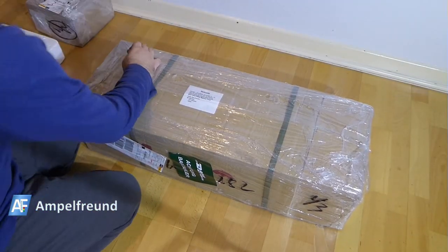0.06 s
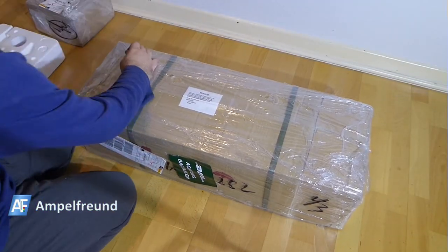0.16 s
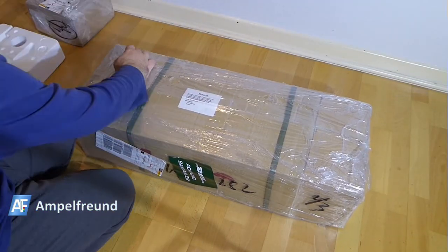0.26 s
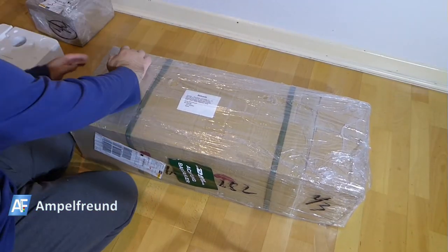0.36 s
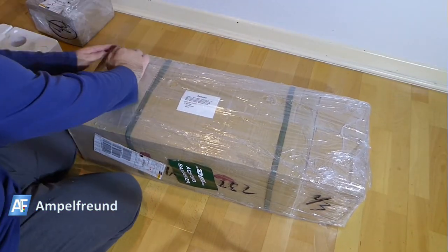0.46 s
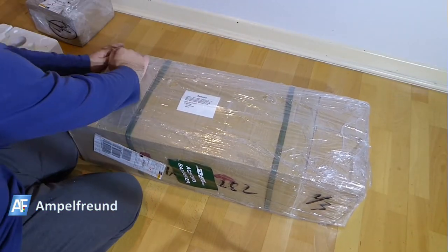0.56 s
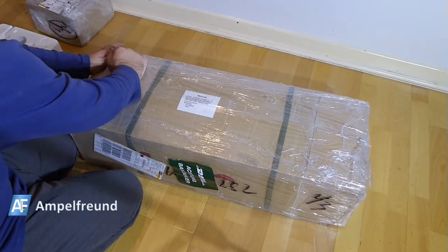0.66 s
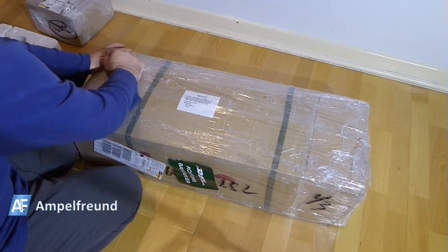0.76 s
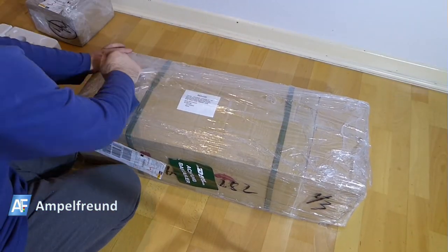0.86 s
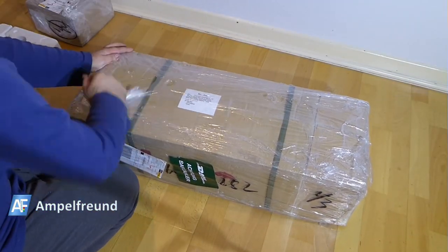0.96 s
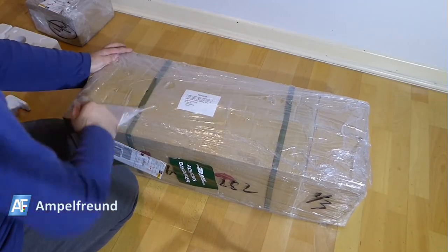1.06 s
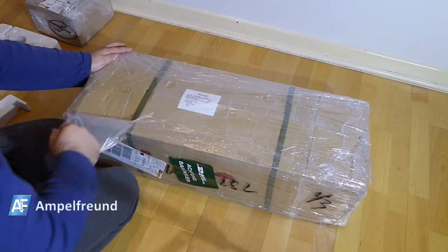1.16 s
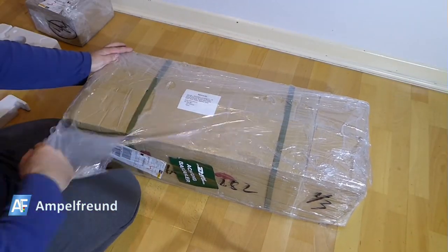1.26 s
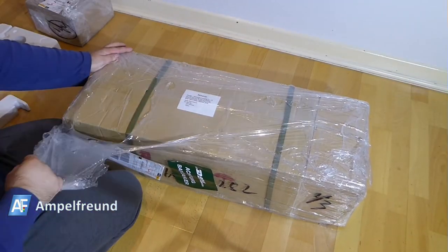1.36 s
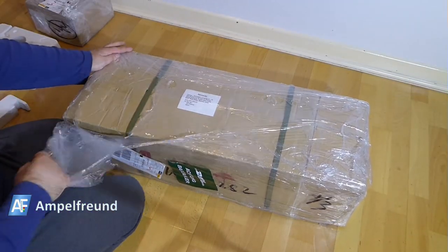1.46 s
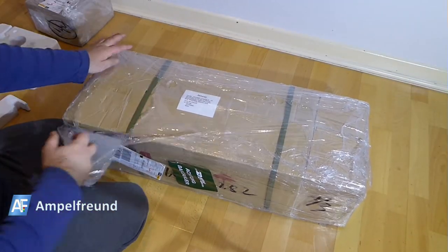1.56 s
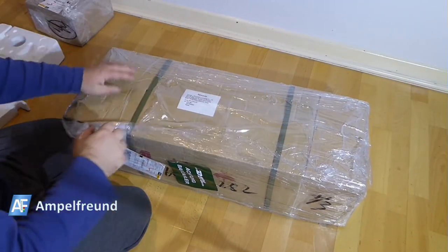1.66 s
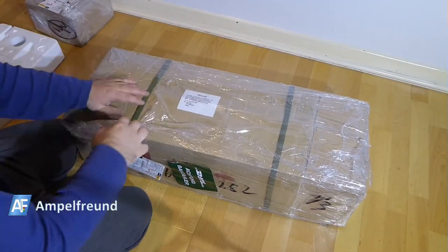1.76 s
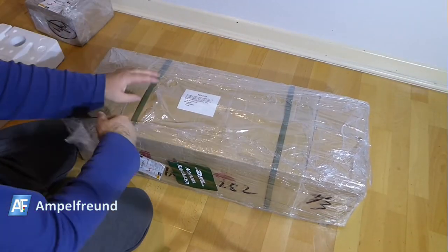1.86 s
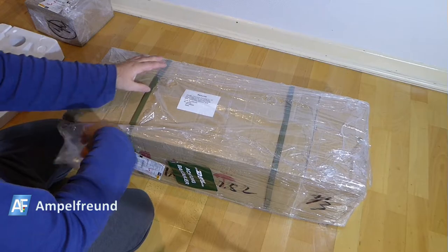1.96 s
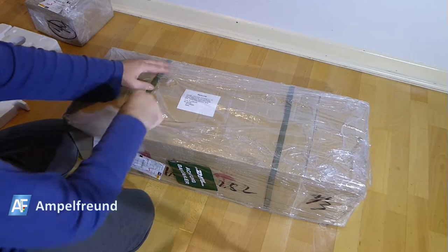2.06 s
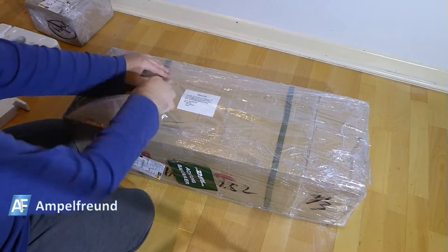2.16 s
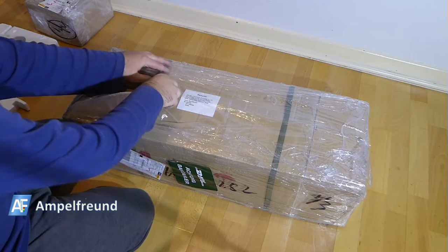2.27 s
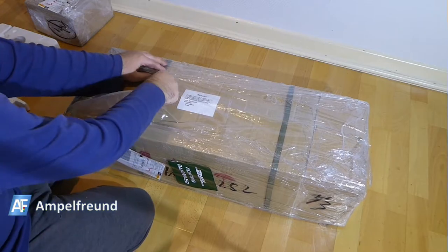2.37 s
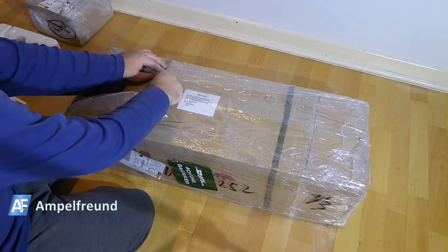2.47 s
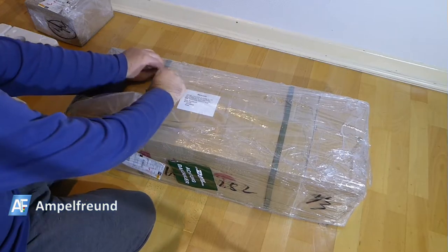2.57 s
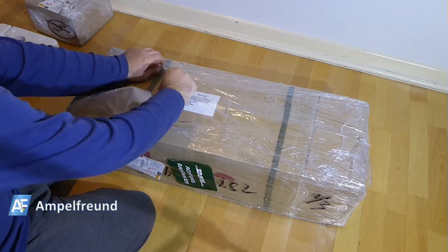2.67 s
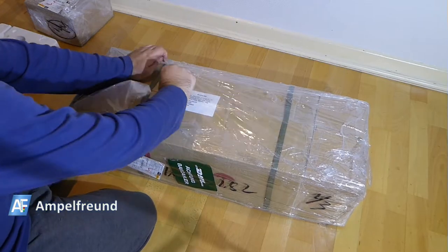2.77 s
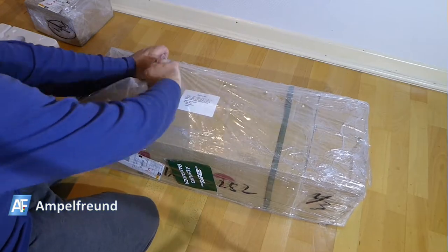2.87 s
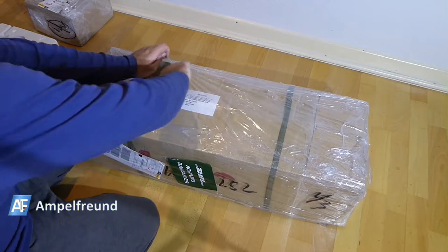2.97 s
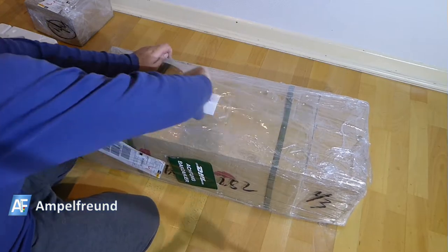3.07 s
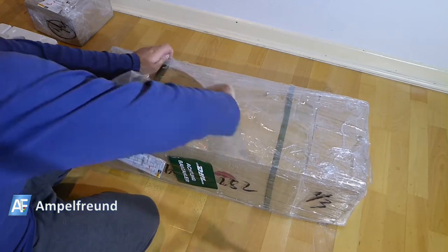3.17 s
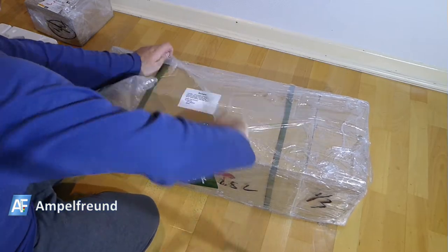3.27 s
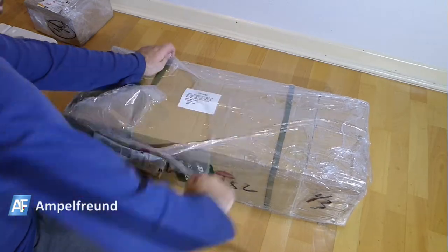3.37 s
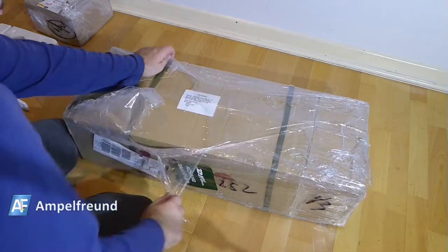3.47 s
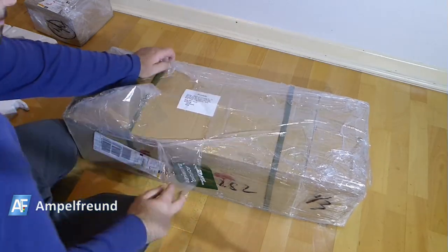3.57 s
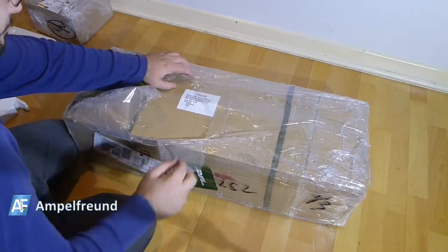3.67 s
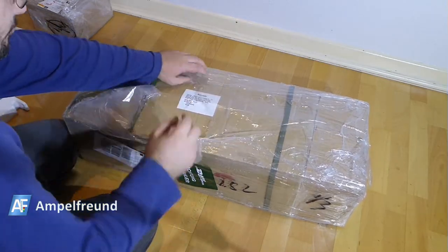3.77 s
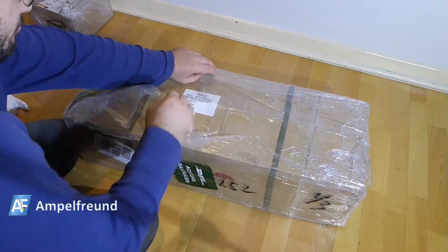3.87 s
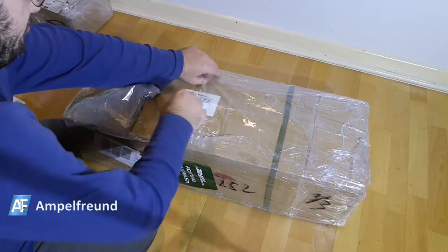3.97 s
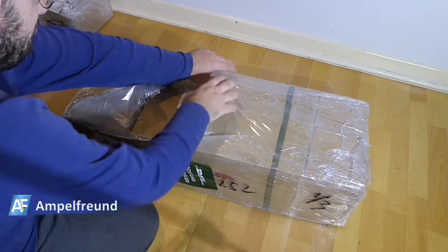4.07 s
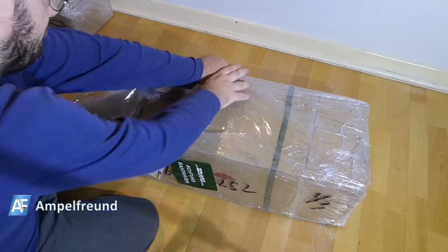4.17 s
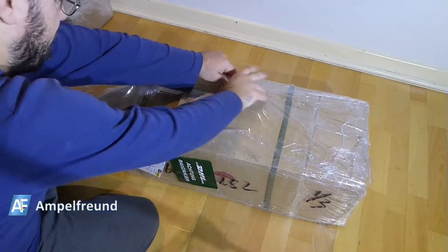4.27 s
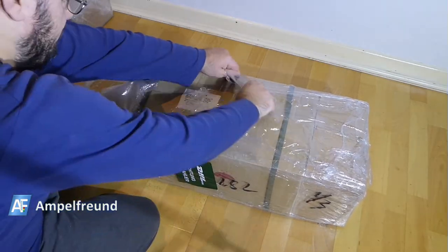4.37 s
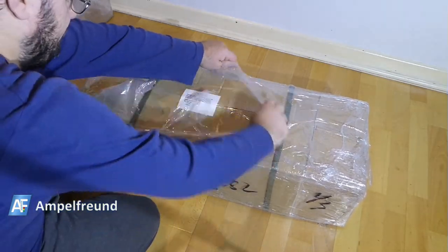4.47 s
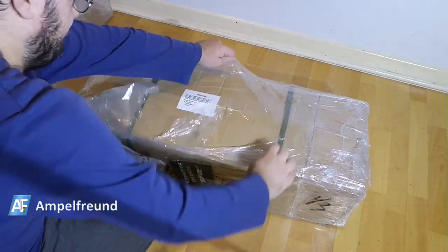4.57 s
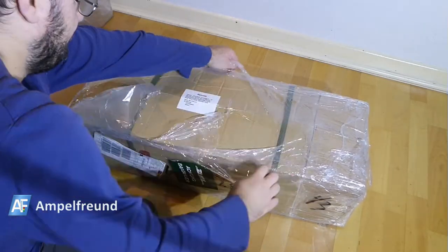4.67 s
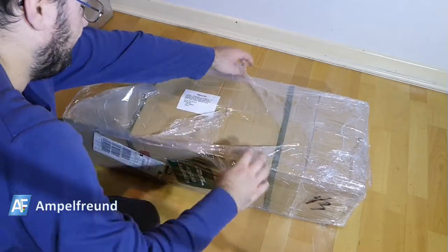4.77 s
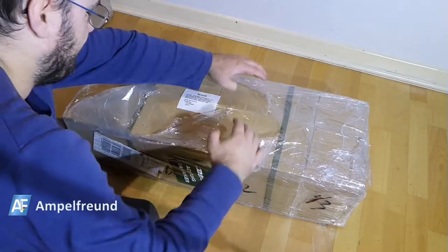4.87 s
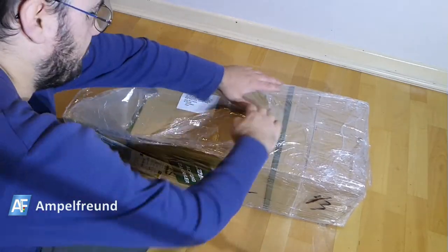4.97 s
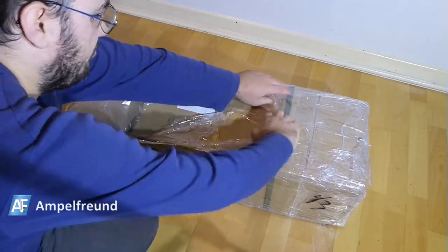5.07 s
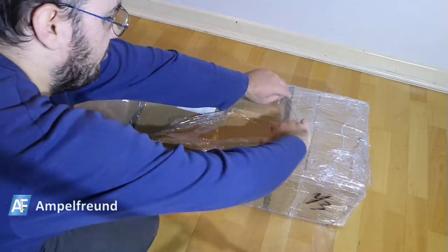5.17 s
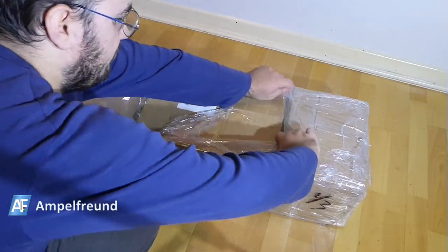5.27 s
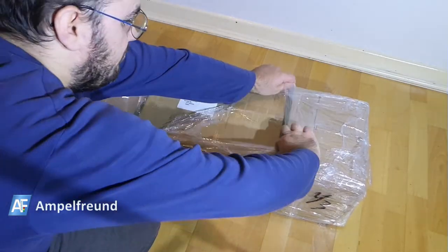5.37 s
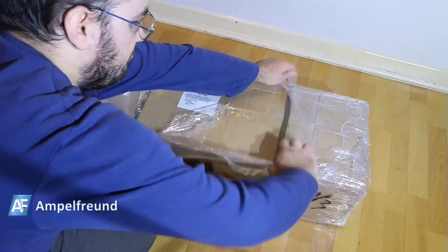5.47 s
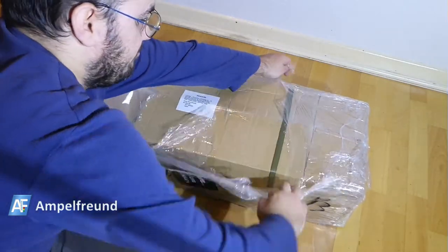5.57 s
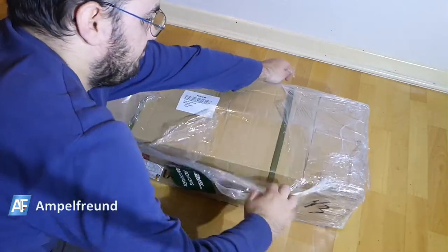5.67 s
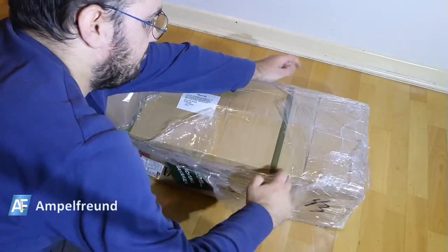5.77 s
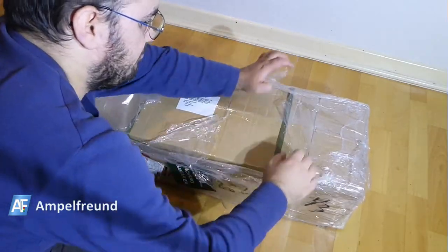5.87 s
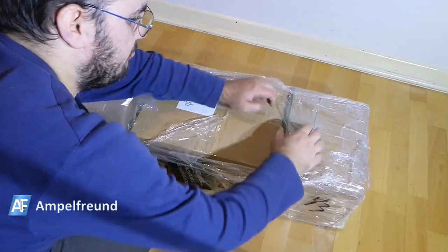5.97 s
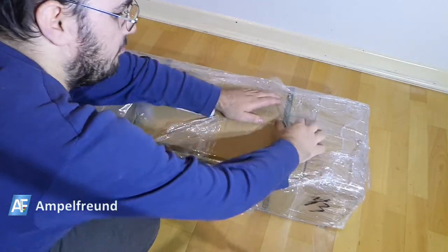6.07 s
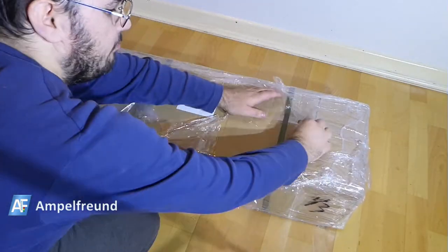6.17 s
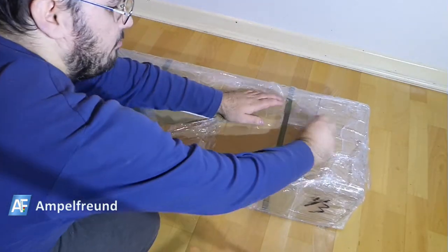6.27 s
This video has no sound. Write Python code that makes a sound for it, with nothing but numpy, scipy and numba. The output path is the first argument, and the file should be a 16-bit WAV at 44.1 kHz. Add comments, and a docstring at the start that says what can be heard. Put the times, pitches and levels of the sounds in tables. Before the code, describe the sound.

Thin plastic film is torn and pulled off a hollow cardboard box, crackling brightly in uneven bursts with sharp snaps and soft knocks, close in a small room.

```python
"""A dense crackle opens at once: thin plastic stretch film is torn and pulled off a cardboard box.
Thousands of creases buckle as tiny swelling and dying sines, over a rumble of film and fingers dragging
on the hollow box. Taut strands snap in short volleys of clicks; hands knock, waking the box modes.
Decaying noise gives a small bare room that smears it all, over a quiet bed of filtered noise."""
import sys
import numpy as np
from scipy import signal
from scipy.fft import rfft, irfft
from scipy.io import wavfile
from scipy.ndimage import uniform_filter1d
from numba import njit

SR = 44100
rng = np.random.default_rng(int(sys.argv[2]) if len(sys.argv) > 2 else 0)


def store_pcm(level_fs):
    """Save levels as 16-bit WAV."""
    pcm = np.round(np.clip(level_fs, -1, 1) * 32767).astype(np.int16)
    wavfile.write(sys.argv[1], SR, np.atleast_2d(pcm).T)


def voltage_ratio(decibels):
    """Convert decibels (scalar or array-like) to amplitude ratios, 20 dB per decade."""
    exponent = np.asarray(decibels, float) / 20
    return 10 ** exponent


N = 279153  # samples, 6.33 s
MIDDLING_DB = -40  # a middling pull, on the scale of PULL


def read(table, column, at):
    """A column of a curve at the given moments, with straight lines between its points."""
    return np.interp(at, np.array(table)[:, 0], np.array(table)[:, column])


def shape(x, points):
    """Filter by (Hz, dB) points, joined over log frequency."""
    hz, db = np.transpose(points)
    f = np.arange(N // 2 + 1) * SR / N + 1
    gain_db = np.interp(np.log(f), np.log(hz), db)
    return irfft(rfft(x) * voltage_ratio(gain_db), N)


def walk(rate):
    """Random levels held 1 / rate s and slewed; spread near 1."""
    hold = int(SR / rate)
    levels = rng.standard_normal(N // hold + 1)
    return uniform_filter1d(np.repeat(levels, hold), hold // 2)[:N]


@njit
def ring(at, lag, hz, t60, rise, left, right, n, sr):
    """Each click is a sine that swells and dies, run until 50 dB down; the right ear is lag samples late."""
    out = np.zeros((2, n + 16))  # 8 spare samples at each end for the lag
    for k in range(len(at)):
        turn = np.exp(2j * np.pi * hz[k] / sr - np.log(1000) / (t60[k] * sr))
        soften = np.exp(-hz[k] / (rise * sr))
        z, soft = 1 + 0j, 1.
        start = int(at[k] * sr)
        for i in range(start, min(n, start + int(t60[k] * sr * 5 / 6) + 2)):
            z *= turn
            soft *= soften
            out[0, i + 8] += left[k] * z.imag * (1 - soft)
            out[1, i + 8 + lag[k]] += right[k] * z.imag * (1 - soft)
    return out[:, 8:n + 8]


def clicks(at, hz, t60, db, sign, pan_db, rise_cycles, lag_spread):
    """Place clicks by level and arrival: spread over the box, they reach the two ears a few samples apart."""
    size = voltage_ratio(db) * np.sign(sign)
    left, right = size * voltage_ratio(pan_db / 2), size * voltage_ratio(-pan_db / 2)
    hz = np.clip(hz, 60, 15300)
    lag = np.round(lag_spread * rng.standard_normal(len(at)))
    lag = np.clip(lag, -8, 8).astype(int)  # negative: the right ear hears it first
    return ring(np.clip(at, 0, None), lag, hz, t60 + 0 * at, rise_cycles, left, right, N, 1. * SR)


# how hard the film is pulled: start_s [s], level_db [dB, crease level before trims]
PULL = [(0, -29.5), (.06, -31.5), (.09, -27.5), (.14, -39.5), (.19, -36), (.42, -44), (.66, -33.5),
        (.71, -24.5), (.9, -27), (1.24, -32.5), (1.31, -32.5), (1.46, -37.5), (1.8, -44.5), (1.87, -50),
        (2.04, -51), (2.1, -39.5), (2.34, -49), (2.39, -55.5), (2.55, -56), (2.62, -36), (2.75, -36),
        (2.84, -44), (2.97, -44.5), (3.11, -31), (3.24, -28), (3.51, -33), (3.77, -51), (3.85, -41),
        (4.02, -51.5), (4.25, -39), (4.3, -30), (4.38, -33.5), (4.54, -25), (4.65, -32.5), (4.82, -39.5),
        (4.99, -64), (5.06, -49.5), (5.16, -41.5), (5.26, -42), (5.3, -37.5), (5.4, -35.5), (5.51, -25),
        (5.65, -33), (5.76, -28.5), (6.03, -55), (6.08, -47.5), (6.27, -51.5), (6.32, -33)]
# where the hands work: start_s [s], patch_hz [Hz, taut patch], pan_db [dB, left minus right],
# scatter_db [dB, scatter of click sizes, held within 1 to 3.4 when played]
HANDS = [(0, 3380, 0, 4.5), (.65, 3320, 1, 1.5), (.72, 2470, 0, 4), (1.05, 3060, 0.5, 0.5),
         (1.4, 3300, .3, 1.5), (2.1, 3080, 0.5, 1.5), (2.65, 4230, 0.5, 1.5), (3.1, 3200, -1.7, -1.5),
         (3.6, 3380, 0, 2.5), (4.45, 3170, -0.86, 2), (5.0, 3950, -1.2, 1), (5.55, 3470, -1.5, 2),
         (6.33, 3040, -1.1, -0.5)]
# clicks of the film by pitch: pitch_hz [Hz], level_db [dB]
FILM = [(500, -4.5), (900, 5), (1500, -1.16), (2500, -1.3), (4000, 1.64), (6000, 9.5), (8000, -2.5),
        (10000, 10), (15500, 10)]
# treble level against the other creases: start_s [s], level_db [dB]
TREBLE = [(0, 0.5), (.12, -7), (.45, -0.5), (.75, -7), (.95, -7), (1.22, 1), (1.4, -5.5), (1.8, -0.5),
          (2.4, -4.5), (2.58, 3.5), (2.82, -8.5), (3.0, -2.5), (3.55, -0.5), (4.5, -3.5), (4.8, -1),
          (5.0, -3), (5.2, -1), (5.6, -3.5), (5.76, -2), (5.9, -6), (6.3, -0.5)]


def creases(count=115000, cycles=7.08, burst_db=1.68, patch_share=.11, patch_cycles=14, patch_db=-1, film_db=-1.5):
    """Creases buckle in bursts; small ones click high, big folds low, and some ring the taut patch of film."""
    u, g = rng.random((count, 3)).T, rng.standard_normal((count, 3)).T
    at = u[0] * N / SR
    sample = (at * SR).astype(int)
    on_patch = u[2] < patch_share
    # the taut patch changes pitch as the grip shifts
    patch_hz = read(HANDS, 1, at) * np.exp(0.25 * walk(30.)[sample] + 0.082 * g[0])
    fold_hz = 500 * 31 ** (u[1] ** 0.589)
    hz = np.where(on_patch, patch_hz, fold_hz)
    # fold size sets the balance: weights rise towards both ends of the pitch range
    big = np.clip(np.log2(2400 / hz), 0, 1)
    fine = np.clip(np.log2(hz / 5500) / 0.11, 0, 1)
    film_hz, film_colour_db = np.transpose(FILM)
    colour = np.interp(np.log(hz), np.log(film_hz), film_colour_db)
    bursts = burst_db * walk(45.)[sample]
    # a ripping edge gives a few big clicks among many small ones; the mean power stays the same
    scatter_db = np.clip(read(HANDS, 3, at), 1, 3.4)
    size = scatter_db * rng.exponential(size=count) + 10 * np.log10(1 - scatter_db * np.log(10) / 10)
    pull_db = read(PULL, 1, at)
    # slack film folds big, taut film creases small: big folds lose 0.2865 dB per dB of pull
    big_db = -3 - 0.2865 * (pull_db - MIDDLING_DB)
    db = film_db + pull_db + big * big_db + fine * read(TREBLE, 1, at)
    db = db + colour + bursts + size + patch_db * on_patch
    pan_db = read(HANDS, 2, at) + 5.7 * g[2]
    t60 = np.where(on_patch, patch_cycles, cycles) / hz
    return clicks(at, hz, t60, db, g[1], pan_db, 0.27, 0.46)


# fingers slide over the cardboard: start_s [s], level_db [dB, rumble before trim],
# fade_db_per_s [dB/s, sign ignored], pitch_hz [Hz, rubbed spot]
SLIDES = [(.9, -30, 27, 640), (1.28, -28, 57, 560), (1.67, -39, 150, 530), (2.04, -41, -2, 300),
          (2.3, -38, 38, 252), (2.8, -57, 40, 460), (2.98, -36, 59, 310), (3.33, -30.5, 29, 430),
          (3.68, -32, 110, 320), (3.84, -32, 132, 676), (4.5, -27, 53, 402), (4.59, -27, 152, 390),
          (5.06, -33, 25, 298), (5.17, -38, 45, 790), (5.53, -24.5, 78, 400), (6.07, -37, 0, 400)]


def rubbing(at):
    """Film rub follows the pull, each slide swells fast and fades; their powers add and weight the pitch."""
    film_at_middling_db, film_db_per_pull_db, film_hz = -43.5, 0.6955, 510
    rise_db_per_s = 351
    s, slide_db, fade, slide_hz = (c[:, None] for c in np.transpose(SLIDES))
    drop_db = np.where(at < s, rise_db_per_s * (s - at), np.abs(fade) * (at - s))
    slides = voltage_ratio(slide_db - drop_db) ** 2
    film = voltage_ratio(film_at_middling_db + film_db_per_pull_db * (read(PULL, 1, at) - MIDDLING_DB)) ** 2
    power = film + slides.sum(axis=0)
    spot_hz = (film * film_hz + (slides * slide_hz).sum(axis=0)) / power
    return 10 * np.log10(power), spot_hz


# modes of the hollow box, also woken by knocks: pitch_hz [Hz], level_db [dB], t60_s [s, ringing free]
BOX = [(142.7, -0.5, 0.61), (158.3, -9.5, 1), (224.5, 5, 0.13), (268, -3, 0.25), (310, 12.5, 0.04),
       (405, 9.5, 0.076), (457, 0, 0.13), (506, 8, 0.094), (640, 4.5, 0.17), (806, 8, 0.095),
       (899, 0.5, 0.37), (1034, -3.5, 0.39), (1320, 2.5, 0.086)]


def drag(count=9000, drag_db=-21, damp=0.68, scatter_db=2.5, spread=1.4, muffled_s=0.15):
    """Dragging film and fingers tap box modes near the rubbed spot at random, muffled by the hands."""
    at, g = rng.random(count) * N / SR, rng.standard_normal((count, 3)).T
    hz, mode_db, t60 = np.array(BOX)[rng.integers(len(BOX), size=count)].T
    rub_db, spot_hz = rubbing(at)
    near_db = -6 * (np.log2(hz / spot_hz) / spread) ** 2  # spread in octaves
    db = drag_db + rub_db + mode_db + near_db + scatter_db * rng.exponential(size=count)
    t60 = np.minimum(damp * t60, muffled_s)
    return clicks(at, hz * (1 + 0.075 * g[0]), t60, db, g[1], 0.66 * g[2], 0.18, 0.)


# colour of the background noise: pitch_hz [Hz], level_db [dB per Hz, relative]
FLOOR = [(18, -47), (30, -26), (270, 5), (656, -5), (1110, 14), (2020, -4), (4910, -5.5), (9940, -19),
         (15500, -46)]


def floor():
    """Quiet room air and microphone hiss: filtered noise, partly shared by both ears, set to -55.5 dB rms."""
    mid, side = rng.standard_normal((2, N))
    air = shape(mid + 0.59 * side * np.array([[1], [-1]]), FLOOR)
    return air * voltage_ratio(-55.5) / air.std()


def tail():
    """The room's answer from one spot: noise dying a little slower in the treble; the ears share the bass."""
    t60_s, treble_t60_s = 0.48, 0.52
    t = np.arange(SR // 2) / SR
    mid, side = rng.standard_normal((2, len(t)))
    wide = signal.lfilter(*signal.butter(1, 600, "high", fs=SR), side)
    both = mid + 0.53 * wide * np.array([[1], [-1]])
    dull = signal.lfilter(*signal.butter(1, 1500, fs=SR), both)
    both = dull * voltage_ratio(-60 * t / t60_s) + (both - dull) * voltage_ratio(-60 * t / treble_t60_s)
    both = both * np.clip((t - .003) / 0.0055, 0, 1)  # silent for 3 ms, then swells in
    return both / np.sqrt(np.mean(np.sum(both ** 2, axis=1)))


def room(x, count=12, room_db=-4.5):
    """The hands move along the box, so the room answers each stretch of work from a new spot."""
    wet = np.zeros((2, N + SR))
    edges = np.linspace(0, N, count + 1).astype(int)
    for start, end in zip(edges[:-1], edges[1:]):
        work = x[:, start:end].mean(axis=0)[None]
        answer = signal.fftconvolve(work, tail(), axes=1)
        wet[:, start:start + answer.shape[1]] += answer
    return x + voltage_ratio(room_db) * wet[:, :N]


# strands that let go: start_s [s], level_db [dB, peak before trim], pitch_hz [Hz],
# fine_db [dB, finest wrinkles against the peak]
STRANDS = [(0.0201, -4, 4270, -4), (0.0722, -10, 2820, 3), (0.1645, -8.5, 3160, 4.5),
           (0.251, -13.5, 2660, -5), (0.465, -22, 1320, 8), (0.615, -9, 6500, -6), (0.6615, -19, 1200, 12),
           (0.7013, -5.5, 1290, 6.5), (0.7207, -3, 2370, -5), (0.7433, -9, 4500, -5), (0.783, -6, 4140, 5),
           (0.827, -14, 2000, 10), (0.8371, -12, 1490, 6), (0.856, -5, 4570, 10), (0.8912, -8, 4400, -1.5),
           (0.952, -18, 1290, -9), (1.0234, -13.5, 1340, 0), (1.1024, -12.5, 1910, 8), (1.274, -4, 3840, 2),
           (1.3007, -7.5, 2670, 10), (1.497, -25, 4500, 12.5), (1.6569, -17, 1980, -4),
           (1.8195, -22.5, 1120, -6), (2.103, -21, 1830, 0), (2.594, -34, 5540, 0), (2.705, -30, 3670, 14),
           (2.752, -20, 3870, -4), (2.8749, -20.5, 1140, 6.5), (3.1118, -10.5, 3800, 4),
           (3.3036, -9.5, 5900, 4), (3.3357, -3, 5970, -8), (3.4071, -8, 2600, 6.5),
           (4.4557, -8, 2370, -15), (4.507, -10, 2430, 6), (5.055, -36, 1090, -1), (5.2907, -20, 2400, 6),
           (5.35, -12, 4030, 0), (5.477, -9, 3140, -7), (5.52, -5, 3800, -7), (5.7253, -20, 2180, -1.5),
           (5.75, -27, 2450, -4), (6.077, -24.5, 1110, -1), (6.3177, -12, 1470, 5.5)]


def snaps(count=40, cycles=6.24, snap_db=-7.5, volley_s=.016, fade_db=11):
    """A strand lets go in a short volley of clicks that dies away; half near its pitch, half fine."""
    s, peak_db, pitch_hz, fine_db = (c[:, None] for c in np.transpose(STRANDS))
    draws = (len(STRANDS), count, 3)
    u = np.moveaxis(rng.random(draws), 2, 0)
    g = np.moveaxis(rng.standard_normal(draws), 2, 0)
    late = u[0] ** 2 * (np.arange(count) > 0)  # the first click lands on the start
    fine = np.arange(count) % 2
    hz = np.where(fine, 3500 * 7.3 ** u[1], pitch_hz * np.exp(0.35 * g[0])).ravel()
    db = snap_db + peak_db + fine * fine_db - fade_db * late + 1.0 * g[1]
    at = (s + volley_s * late).ravel()
    return clicks(at, hz, cycles / hz, db.ravel(), g[2].ravel(), read(HANDS, 2, at), 0.3, 0.63)


# hands meet the cardboard: start_s [s], level_db [dB, peak before trim], pitch_hz [Hz, struck spot],
# damp [share of the free ring time], spread_oct [octaves, spread of modes]
KNOCKS = [(0.161, -21.5, 790, 0.23, 0.77), (0.248, -30, 520, 0.64, 0.37), (0.7, -26, 555, 0.46, 0.42),
          (0.775, -29, 842, 0.46, 0.39), (0.888, -21, 980, 0.41, 0.7), (1.229, -31.5, 510, 0.8, 0.24),
          (1.274, -25, 574, 0.43, 0.6), (1.301, -26, 544, 0.34, 0.77), (1.658, -30.5, 450, 0.63, 0.22),
          (1.818, -30, 640, 0.26, 0.63), (2.044, -42, 509, 0.5, 0.41), (2.289, -16, 205, 0.45, 0.42),
          (2.335, -34.5, 405, 0.82, 0.47), (2.873, -33, 420, 0.6, 0.22), (2.963, -29, 200, 0.47, 0.75),
          (3.002, -27.5, 270, 0.31, 1.1), (3.039, -30, 136, 0.14, 0.65), (3.334, -29, 496, 0.65, 0.36),
          (3.663, -25.5, 304, 0.43, 0.67), (3.807, -31.5, 700, 0.73, 0.6), (3.825, -30.5, 467, 1, 0.28),
          (4.238, -22, 970, 0.41, 0.27), (4.442, -25, 640, 0.21, 0.33), (4.462, -27, 145, 0.15, 0.4),
          (4.56, -23.5, 283, 0.48, 0.83), (4.635, -40, 466, 0.26, 0.6), (5.051, -33.5, 297, 0.7, 1.1),
          (5.075, -25, 147, 0.35, 0.38), (5.134, -32, 150, 0.2, 0.32), (5.193, -27, 750, 0.44, 0.41),
          (5.52, -23.5, 394, 0.67, 0.21), (6.07, -36, 298, 0.6, 1.1), (6.149, -27.5, 252, 0.25, 0.61)]


def knocks(knock_db=-5.0):
    """A knock wakes the box modes near the pitch of the struck spot; a fingertip wakes few, a palm many."""
    s, peak_db, spot_hz, damp, spread = (c[:, None] for c in np.transpose(KNOCKS))
    hz, mode_db, t60 = np.transpose(BOX)
    g = np.moveaxis(rng.standard_normal((len(KNOCKS), len(BOX), 2)), 2, 0)
    near_db = -6 * (np.log2(hz / spot_hz) / np.clip(spread, .1, 2)) ** 2
    db = knock_db + peak_db + mode_db + near_db + 1.8 * g[0]
    # soft skin lands over a few ms, so the low modes start a little late
    at = (s + 0.00204 + 0.33 * rng.random(db.shape) / hz).ravel()
    t60 = (t60 * np.clip(damp, .1, 1.5)).ravel()
    hz = (hz * (1 + 0.013 * g[1])).ravel()
    return clicks(at, hz, t60, db.ravel(), 1., 0 * at, 0.35, 0.)


def scene():
    """Film and box in the room, over the floor."""
    return room(creases() + snaps() + knocks() + drag()) + floor()


def top_cut(x):
    """Nothing passes above the cut-off."""
    return signal.sosfilt(signal.butter(12, 15450, fs=SR, output="sos"), x)


# colour of the microphone: pitch_hz [Hz], level_db [dB]
MIC = [(300, 1.5), (1000, -1.3), (1400, 3), (5000, 2.5), (6500, 3), (10000, 6.5), (15500, -0.5)]


def record(dry):
    """A bright microphone cuts the deep bass steeply, down to a low shelf, and rounds the sharpest peaks."""
    bright = shape(dry, MIC)
    bass_cut = signal.butter(5, 110, "high", fs=SR, output="sos")
    cut = signal.sosfilt(bass_cut, bright) + voltage_ratio(-24.5) * bright
    mix = 0.67 * np.tanh(cut / 0.72)
    return top_cut(mix)


dry = scene()
out = record(dry)
store_pcm(out)
```